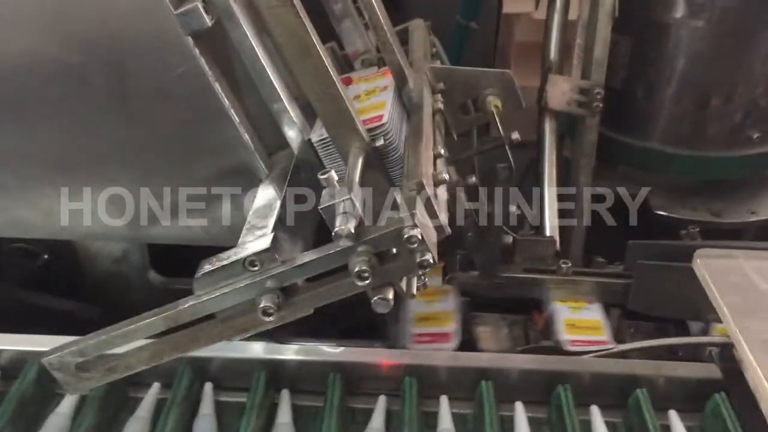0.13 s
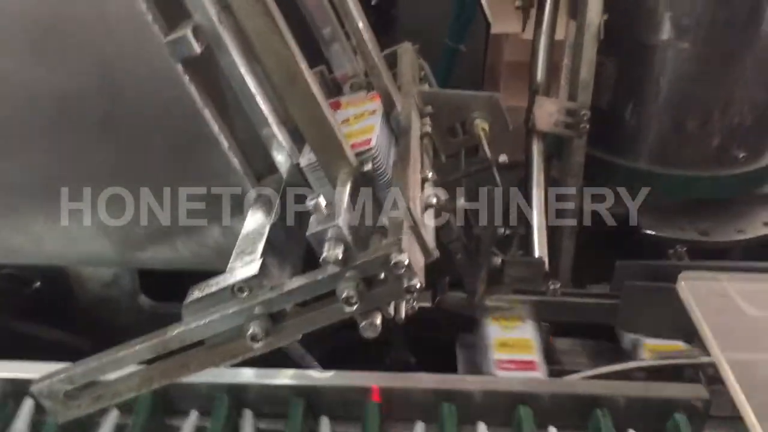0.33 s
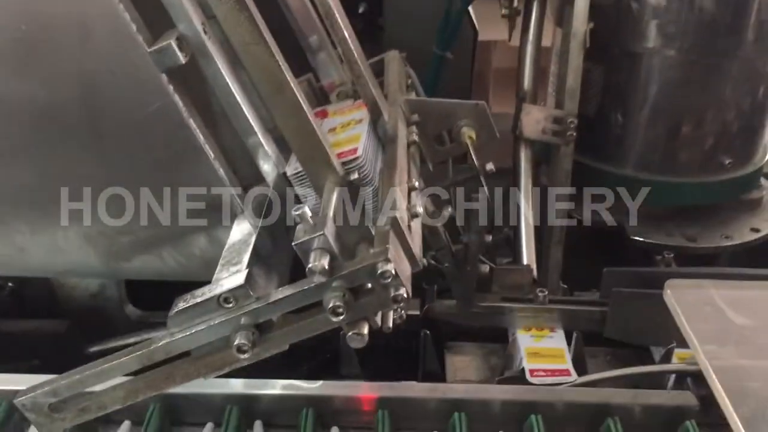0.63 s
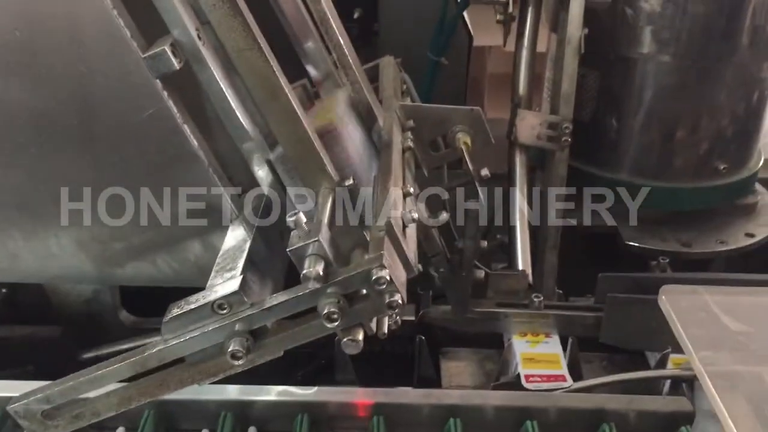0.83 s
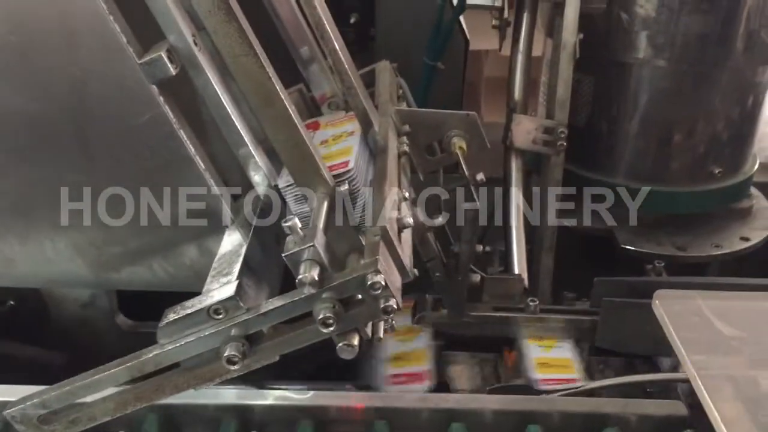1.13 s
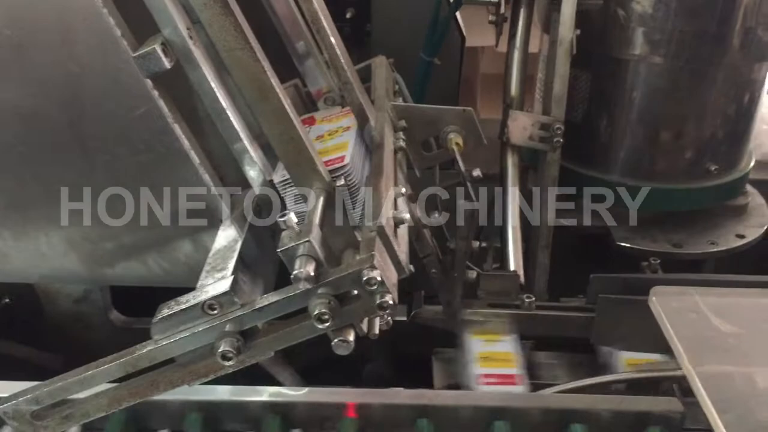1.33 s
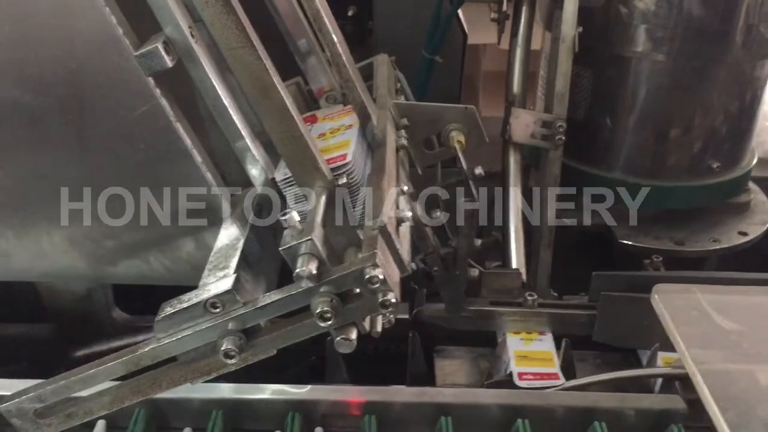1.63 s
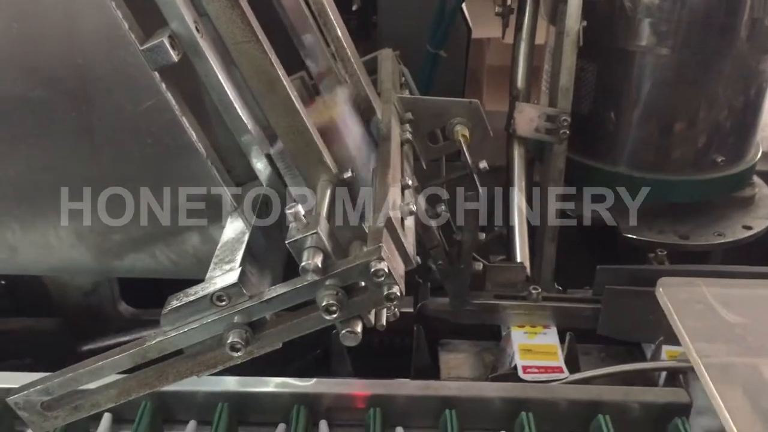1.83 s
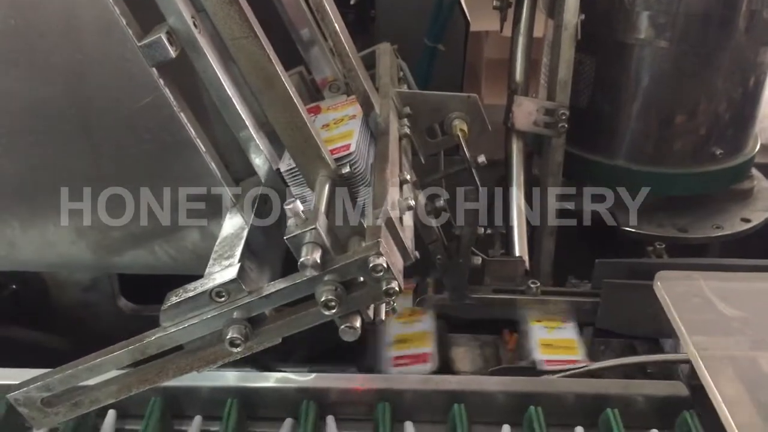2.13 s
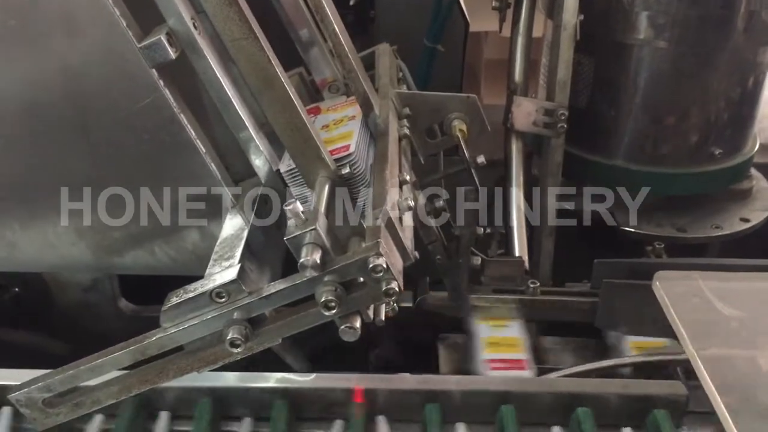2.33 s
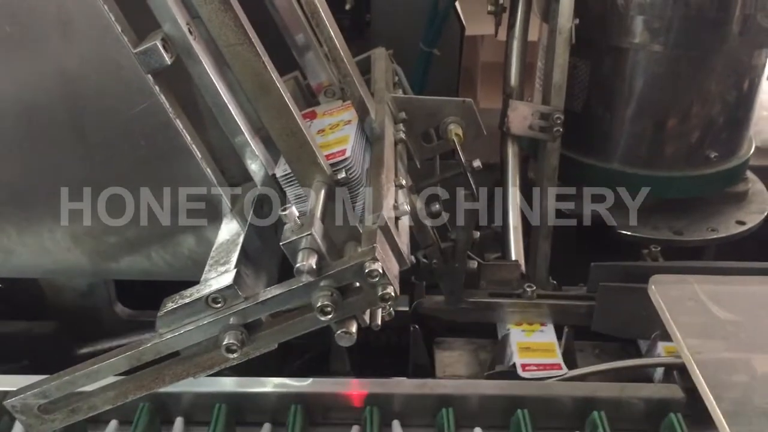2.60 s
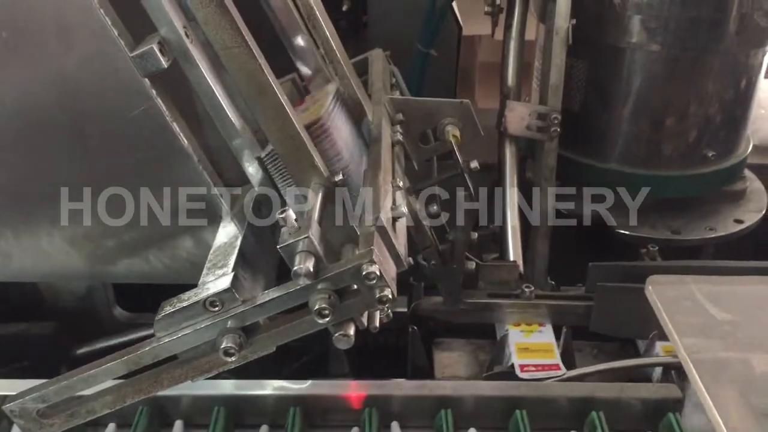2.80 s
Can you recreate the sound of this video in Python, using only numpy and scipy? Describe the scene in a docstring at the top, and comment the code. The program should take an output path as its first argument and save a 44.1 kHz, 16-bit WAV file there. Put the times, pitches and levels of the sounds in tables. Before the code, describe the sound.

A packaging machine runs up close, clacking about once a second over hissing air and factory roar

```python
"""Motors hum and a loud factory hall roars around a cartoning machine, heard by a close phone.
Chains rattle as random taps on short resonances; air hisses in swells, as coloured noise, from the
suction cups and, lower and narrower, from the vacuum ejector. Guides knock, the frame thuds, valves
tick and, about once a second, the pusher clacks: blows of rough noise ringing in the struck part.
The steel around the machine scatters the rattle and the blows into a short dense echo."""
import sys
import numpy as np
from scipy import signal
from scipy.fft import rfft, irfft
from scipy.io import wavfile
from scipy.ndimage import uniform_filter1d

SR = 44100
rng = np.random.default_rng(int(sys.argv[2]) if len(sys.argv) > 2 else 0)


def transcribe(signal):
    """Save signal, clipped to [-1, 1], as a 16-bit WAV file at the path in sys.argv[1]."""
    frames = np.atleast_2d(signal).T
    limited = np.clip(frames, -1, 1)
    pcm = np.round(limited * 32767).astype(np.int16)
    wavfile.write(sys.argv[1], SR, pcm)


def to_linear_factor(level_db):
    """Convert decibel levels (scalar or array-like) to linear amplitude factors."""
    exponent = np.asarray(level_db, float) / 20
    return 10 ** exponent


N = 130536  # samples, just under 3 s


def unit(x):
    """Scale to rms 1."""
    return x / np.sqrt(np.mean(x ** 2))


def colour(x, points):
    """Shape the spectrum of x by (Hz, dB) points along log frequency; rms 1."""
    hz, db = np.array(points).T
    f = np.maximum(np.arange(len(x) // 2 + 1) * SR / len(x), 1)
    gain = to_linear_factor(np.interp(np.log(f), np.log(hz), db))
    return unit(irfft(rfft(x) * gain, len(x)))


def band(x, hz, width_hz):
    """Resonant band-pass, gain 1 at the centre."""
    return signal.lfilter(*signal.iirpeak(hz, hz / width_hz, fs=SR), x)


def walk(rate):
    """Random levels held 1 / rate seconds and slewed twice; spread near 0.5."""
    hold = int(SR / rate)
    steps = np.repeat(rng.standard_normal(N // hold + 1), hold)
    return 0.7 * uniform_filter1d(uniform_filter1d(steps, hold), hold)[:N]


def follow(points):
    """Straight lines through (seconds, dB) points, one value per sample."""
    return np.interp(np.arange(N) / SR, *np.array(points).T)


def add(out, start_s, sound):
    """Mix a sound in at a time."""
    i = int(start_s * SR)
    out[i:i + len(sound)] += sound[:N - i]


def ring(modes, scatter_db, rise_s):
    """One blow: a snap, then rough contact noise, dying away in each broad resonance of the part."""
    snap_share = 1.3  # first contact against the rough chatter after it
    t = np.arange(SR // 2) / SR
    out = 0
    for hz, width_hz, db, t60 in modes:
        fall = to_linear_factor(-60 * t / t60)
        chatter = band(rng.standard_normal(len(t)), hz, width_hz)
        rough = unit(band(chatter, hz, 2.6 * width_hz)) * fall
        tone = np.sin(2 * np.pi * (hz * t + rng.random()))
        snap = snap_share * tone * np.exp(-t * width_hz)
        steady = np.sqrt(np.sum(fall ** 2) / np.sum(rough ** 2))  # every blow carries its full energy
        level = to_linear_factor(db + scatter_db * rng.standard_normal())
        out = out + level * (steady * rough + snap)
    return out * (1 - np.exp(-t / rise_s))


def roar():
    """Hall noise whose half-octave bands swell together and flicker alone."""
    # Spectrum of the hall. Each row: frequency in Hz, density in dB per Hz (relative).
    hall_spectrum = [(15, -50), (32, -16), (50, -7.5), (91, -3.5), (144, -2), (200, -4.5), (378, -6.5),
                     (482, -11), (945, -7), (1450, -9), (1900, -8), (2560, -8), (3260, -15), (4040, -22.5),
                     (5000, -19), (7910, -23.5), (9300, -23), (10400, -30.5), (11500, -28), (16000, -28)]
    level_db = -22
    swell_db, flicker_db = 0.92, 1.78  # dB per unit of walk
    noise = rfft(colour(rng.standard_normal(N), hall_spectrum))
    swell = walk(5.07)
    hz = np.maximum(np.arange(len(noise)) * SR / N, 20)
    place = 2 * np.log2(hz / 20)  # half octaves above 20 Hz
    out = 0
    for k in range(21):
        share = np.clip(1 - np.abs(place - k), 0, 1)  # neighbouring bands cross-fade
        out = out + irfft(noise * share, N) * to_linear_factor(swell_db * swell + flicker_db * walk(9.2))
    return to_linear_factor(level_db) * unit(out)


def motors():
    """Hum lines that waver and follow the load, and the noisy whine of gears rubbing the casing."""
    # Motor hum. Each row: frequency in Hz, level in dB rms before load and waver, waver in dB.
    hum_lines = [(99.9, -34.5, 4), (75.2, -38, -2)]
    # Motor load. Each row: time in seconds, change of the hum in dB.
    motor_load = [(0, -11), (.15, 2), (.55, 3), (.7, 2.5), (.95, -2.5), (1.2, 4), (1.45, 0.5), (1.65, -1.5),
                  (1.85, 2.5), (2.2, 0), (2.35, 4), (2.55, -1), (2.7, 5), (2.96, -2)]
    # Gearbox casing resonances. Each row: frequency in Hz, width in Hz, level in dB rms before waver.
    casing = [(1845, 48, -36), (1910, 45, -36.5), (2294, 110, -38), (2445, 59, -39), (2600, 100, -41),
              (1028, 140, -39.5), (3990, 89, -41), (4420, 70, -46)]
    gear_waver_db = 0.5  # per unit of walk
    t = np.arange(N) / SR
    load_db = follow(motor_load)
    out = np.zeros(N)
    for hz, db, waver_db in hum_lines:
        level = np.sqrt(2) * to_linear_factor(db + load_db + waver_db * walk(5.5))  # rms to sine peak
        out += level * np.sin(2 * np.pi * (hz * t + rng.random()))
    for hz, width_hz, db in casing:
        whine = unit(band(rng.standard_normal(N), hz, width_hz))
        out += to_linear_factor(db + gear_waver_db * walk(8.28)) * whine
    return out


def air():
    """Hiss of the suction cups and cylinders: coloured noise follows the flow with a light flutter."""
    # Air flow. Each row: time in seconds, level in dB before the lift and flutter below.
    flow = [(0, -35.5), (.07, -36), (.078, -26), (.1, -28), (.11, -40), (.22, -35), (.26, -28.5),
            (.37, -29), (.47, -36), (.56, -42), (.7, -42), (.78, -31), (.97, -29), (1.06, -32),
            (1.2, -39.5), (1.25, -29.5), (1.38, -27), (1.47, -38), (1.65, -46), (1.77, -35), (1.81, -32),
            (2.06, -27), (2.15, -35), (2.24, -32), (2.38, -26.5), (2.47, -35), (2.6, -36), (2.78, -40),
            (2.81, -37), (2.94, -28)]
    # Spectrum of the hiss. Each row: frequency in Hz, density in dB per Hz (relative).
    hiss_spectrum = [(1500, -22), (2800, 1), (4000, 2.5), (5000, -0.5), (6500, 0.5), (8000, -4), (9500, -2),
                     (10100, -3), (10500, -13), (11000, -3), (12000, -4.5), (16000, -4.5)]
    lift_db = 4  # flat lift in dB on the whole hiss
    flutter_db = 1.9 * walk(39.9)
    hiss = colour(rng.standard_normal(N), hiss_spectrum)
    return to_linear_factor(follow(flow) + lift_db + flutter_db) * hiss


def ejector():
    """A lower, narrower hiss while the vacuum is drawn: noise through two resonances at one pitch."""
    # Ejector flow. Each row: time in seconds, level in dB rms before a light flutter.
    draw = [(0, -35), (.2, -43), (.3, -30), (.45, -33), (.55, -41), (.7, -44), (.71, -29.5), (1.03, -30.5),
            (1.1, -35), (1.22, -45), (1.36, -28), (1.5, -37.5), (1.66, -33.5), (1.7, -38), (1.9, -33.5),
            (2.07, -27), (2.2, -36), (2.38, -33), (2.47, -27), (2.55, -50), (2.76, -46), (2.82, -41),
            (2.94, -37)]
    hz, width_hz = 3960, 970
    narrow = band(rng.standard_normal(N), hz, width_hz)
    hiss = unit(band(narrow, hz, 2 * width_hz))
    return to_linear_factor(follow(draw) + walk(29.2)) * hiss


def rattle():
    """Chain links tap at random, with either sign, and ring briefly in broad resonances."""
    taps_per_s, scatter_db, level_db = 250, 3.5, -34
    when = rng.random(N) < taps_per_s / SR
    taps = when * to_linear_factor(scatter_db * rng.standard_normal(N)) * rng.choice([-1, 1], N)
    ringing = band(taps, 2560, 670) + band(taps, 1340, 310)
    ringing += 0.67 * band(taps, 1840, 200)
    ringing += 0.5 * band(taps, 500, 300)
    ringing += 0.22 * band(taps, 3500, 500)
    chain = unit(band(ringing, 1430, 3700))
    return to_linear_factor(level_db + 2.2 * walk(20)) * chain


def knocks():
    """Guides are struck: each blow rings in one broad resonance at its own pitch."""
    # Guide knocks. Each row: start in seconds, peak level in dB, main pitch in Hz.
    guide_knocks = [(0.082, -3, 2400), (0.126, -11, 1910), (0.175, -4, 1540), (0.319, -11, 1000),
                    (0.475, -6, 770), (0.597, -16, 1920), (0.782, -5.5, 950), (1.262, -12, 1400),
                    (1.552, -7.5, 1890), (1.576, -6, 1250), (1.653, -9.5, 1870), (1.725, -4, 1860),
                    (1.819, -8, 1870), (2.182, -5, 980), (2.369, -3, 1850), (2.461, -11, 1060),
                    (2.633, -11, 1860), (2.742, -14, 2430)]
    rms_db = -16  # rms at the blow against its peak
    width_share, t60_s, rise_s = 0.28, 0.14, 0.00067  # width is a share of the main pitch
    out = np.zeros(N)
    for start_s, db, hz in guide_knocks:
        guide = [(hz, width_share * hz, 0, t60_s)]
        add(out, start_s, to_linear_factor(db + rms_db) * ring(guide, scatter_db=-0.5, rise_s=rise_s))
    return out


def thuds():
    """The machine frame thuds: its modes sound weaker the further they lie from the blow's pitch."""
    # Frame thuds. Each row: start in seconds, peak level in dB, main pitch in Hz.
    frame_thuds = [(0.121, -20, 154), (0.225, -17, 206), (0.27, -25, 186), (0.368, -17, 218),
                   (0.469, -12, 148), (0.55, -21, 268), (0.75, -17, 210), (0.823, -12.5, 237),
                   (0.874, -12.5, 380), (1.434, -14, 186), (1.518, -20, 156), (1.804, -15, 195),
                   (1.854, -14.5, 375), (2.189, -19.5, 159), (2.441, -14.5, 156), (2.486, -16.5, 210),
                   (2.661, -32, 180), (2.799, -10.5, 200)]
    # Frame modes. Each row: frequency in Hz, width in Hz, relative level in dB, 60 dB fall in seconds.
    frame_modes = [(149.7, 36, -3.5, 0.24), (196.7, 71, -2, .18), (240.6, 69, -0.5, 0.21),
                   (289, 96, -4.5, 0.13), (363, 72, 0, 0.16), (595, 280, -12, .1)]
    rms_db = -11  # rms at the blow against its peak
    focus_db = 5.5  # loss per octave away from the main pitch
    out = np.zeros(N)
    for start_s, db, main_hz in frame_thuds:
        modes = []
        for hz, width_hz, mode_db, t60 in frame_modes:
            octaves = abs(np.log2(hz / main_hz))
            modes.append((hz, width_hz, mode_db - focus_db * octaves, t60))
        add(out, start_s, to_linear_factor(db + rms_db) * ring(modes, scatter_db=-0.5, rise_s=0.0025))
    return out


def ticks():
    """Valves tick: a small body struck, its bright resonances dying within hundredths of a second."""
    # Valve ticks. Each row: start in seconds, peak level in dB.
    valve_ticks = [(0.1685, -15), (0.2434, -10), (0.4419, -8), (0.7056, -5), (0.998, -12), (1.2371, -11),
                   (1.422, -9), (1.5502, -13.5), (1.6745, -6), (2.204, -11), (2.369, -7.5), (2.6678, -4.5)]
    # Valve body. Each row: frequency in Hz, width in Hz, relative level in dB, 60 dB fall in seconds.
    valve_body = [(2020, 1500, 3.5, 0.054), (2900, 900, -3.5, 0.072), (3600, 210, -6, 0.048),
                  (4040, 240, -3.5, .06), (5700, 700, -4, 0.037), (8760, 480, -2.5, 0.024),
                  (10100, 800, -9, .02)]
    rms_db = -14  # rms at the blow against its peak
    out = np.zeros(N)
    for start_s, db in valve_ticks:
        add(out, start_s, to_linear_factor(db + rms_db) * ring(valve_body, scatter_db=1.5, rise_s=0.001))
    return out


def clacks():
    """The pusher clacks: its arm rings from the low mids to the treble, the low modes longest."""
    # Pusher clacks. Each row: start in seconds, peak level in dB.
    pusher_clacks = [(0.826, -7.5), (1.7998, -6), (2.7907, -3)]
    # Pusher arm. Each row: frequency in Hz, width in Hz, relative level in dB, 60 dB fall in seconds.
    pusher_arm = [(995, 230, -4, 0.22), (1910, 360, -3, 0.2), (2860, 390, -9, 0.12), (3950, 700, -6, 0.046),
                  (5770, 650, 0.5, 0.038), (7000, 1200, -6.5, 0.057), (8700, 2300, -11, 0.057),
                  (12300, 4100, -4, 0.054)]
    rms_db = -14  # rms at the blow against its peak
    out = np.zeros(N)
    for start_s, db in pusher_clacks:
        add(out, start_s, to_linear_factor(db + rms_db) * ring(pusher_arm, scatter_db=1, rise_s=0.0005))
    return out


def echo(x):
    """Dense scatter from the steel around the machine: a decaying noise tail of unit energy."""
    t60_s, gap_s = 0.31, 0.003
    t = np.arange(SR // 2) / SR
    tail = rng.standard_normal(len(t)) * to_linear_factor(-60 * t / t60_s) * (t > gap_s)
    return signal.fftconvolve(x, tail / np.sqrt(np.sum(tail ** 2)))[:N]


def scene():
    """One microphone port: both channels hear the same."""
    echo_db = -5
    near = rattle() + knocks() + thuds() + ticks() + clacks()
    mid = near + to_linear_factor(echo_db) * echo(near) + roar() + motors() + air() + ejector()
    return np.array([mid, mid])


def roll_off(x):
    """The treble ends steeply here."""
    return signal.sosfilt(signal.butter(12, 16610, fs=SR, output="sos"), x)


def record(dry):
    """The phone rounds the loudest peaks and steeply cuts the top."""
    top_hz = 15290
    rounded = np.tanh(0.8 * dry) / 0.8
    low_pass = signal.ellip(16, 0.3, 90, top_hz, fs=SR, output="sos")
    cut = signal.sosfilt(low_pass, rounded)
    return roll_off(cut)


dry = scene()
out = record(dry)
transcribe(out)
```